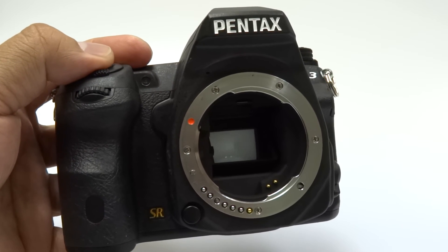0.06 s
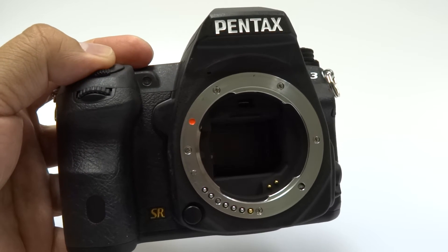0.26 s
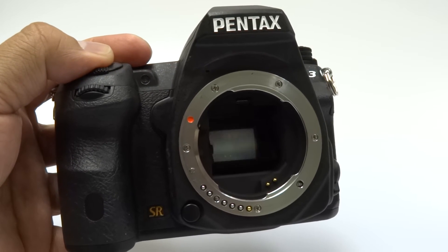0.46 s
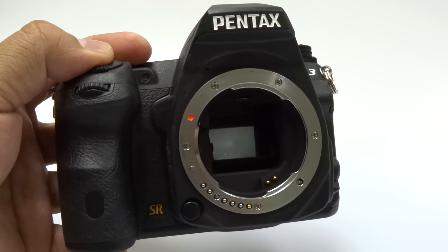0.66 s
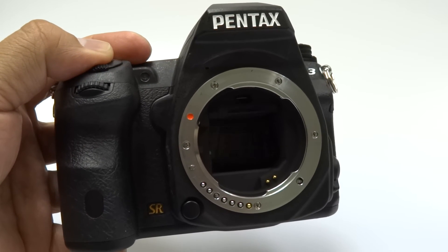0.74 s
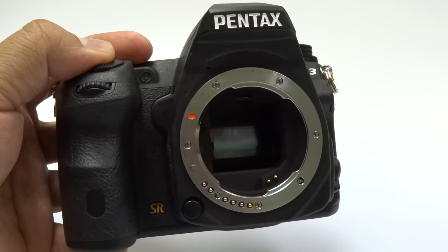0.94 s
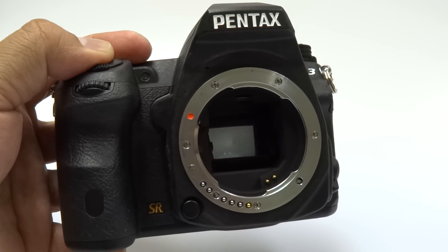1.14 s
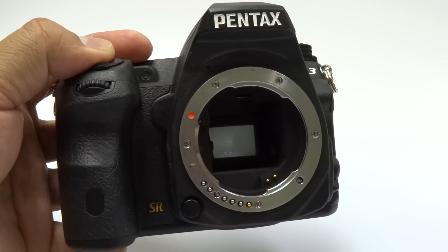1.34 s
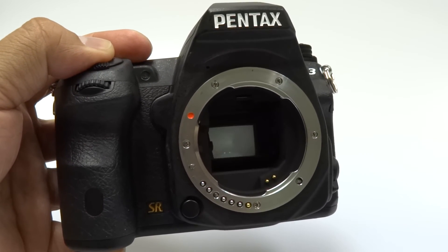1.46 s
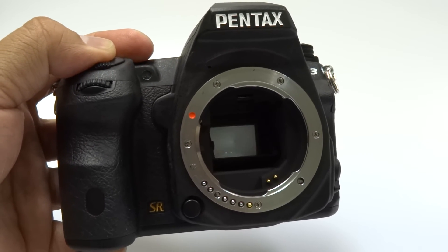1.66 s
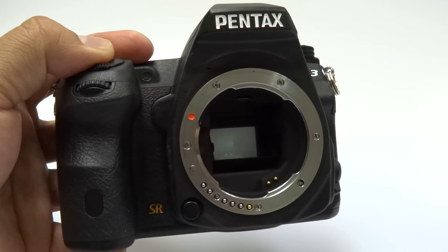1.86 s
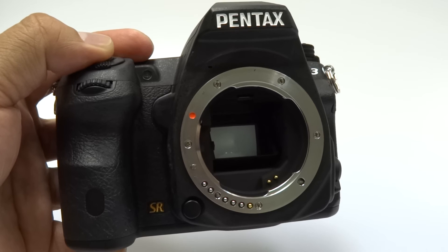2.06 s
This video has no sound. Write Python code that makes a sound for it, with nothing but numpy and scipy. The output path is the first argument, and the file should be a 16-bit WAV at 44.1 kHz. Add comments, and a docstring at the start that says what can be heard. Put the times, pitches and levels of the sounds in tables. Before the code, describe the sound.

Ten quick camera shutter and mirror clacks in an even run in a quiet room.

```python
"""A reflex camera fires ten shots, close by, in a quiet room with a faint hum.
The release button ticks. In each shot the release magnet whines and its armature scrapes,
the mirror flips up, two shutter curtains snap across, gears recock the mechanism, and the mirror
drops back with a spring sizzle and a hollow knock. The contacts ring the camera body and the room
reverberates. The first shot is slower; the rest follow about 0.16 s apart."""
import sys
import numpy as np
from scipy import signal
from scipy.fft import rfft, irfft
from scipy.io import wavfile
from scipy.ndimage import uniform_filter1d

SR = 44100
rng = np.random.default_rng(int(sys.argv[2]) if len(sys.argv) > 2 else 0)


def to_wav(sig):
    """Store sig (one row per channel, or 1-D mono) as 16-bit WAV at the path in sys.argv[1].

    Samples outside -1..1 are clipped; the rate is SR.
    """
    pcm = np.clip(np.atleast_2d(sig), -1, 1) * 32767
    pcm = np.round(pcm).astype(np.int16)
    wavfile.write(sys.argv[1], SR, pcm.T)  # frames by channels


N = 92610
SHORT = 4096  # samples per burst
TOP_HZ = 11020


# Shots: open t/s, close t/s, return t/s, level/dB, knock level/dB
SHOTS = [(0.2521, 0.31, .3499, -1.5, -3), (.4487, 0.47, .5106, -.5, -4.5), (0.608, 0.6306, .6710, 0.5, -3),
         (.7691, 0.7913, .8320, 0, -0.5), (0.9309, 0.9536, .9938, -1, -9), (1.0923, 1.1152, 1.1558, 0, -2),
         (1.2543, 1.2765, 1.3172, 0, -1), (1.4162, 1.439, 1.4782, 0.5, -0.5),
         (1.5766, 1.5994, 1.6400, -.5, -2), (1.738, 1.7614, 1.8018, -.5, -2.5)]
# Contacts in a shot: part, stage, delay from stage/s, level/dB, rise/s, decay/s
CONTACTS = [("lever", "open", -.0146, -19, 0.00067, .003), ("lever", "open", -.0131, -13, 0.00151, 0.0013),
            ("mirror", "open", -.009, -19.5, 0.00052, .0014),
            ("mirror", "open", -0.0059, -19.5, .0003, 0.0024),
            ("blade", "open", -0.0001, -10.5, .0001, 0.00063),
            ("blade", "open", 0.00054, -22, 0.00052, 0.0044), ("blade", "open", .0047, -17, 0.00048, .002),
            ("blade", "open", 0.0049, -19.5, 0.00013, 0.0034),
            ("curtain", "close", -.007, -22, 0.00051, 0.0023),
            ("blade", "close", -0.0047, -24, 0.00033, 0.00056),
            ("blade", "close", -.0006, -22, 0.00034, 0.0013),
            ("curtain", "close", .0001, -14.5, 0.00113, 0.0015),
            ("gear", "return", -0.017, -22, .0005, 0.0025),
            ("gear", "return", -.0114, -19.5, 0.0023, 0.0037),
            ("stop", "return", -.0014, -18, 0.0013, 0.0034), ("stop", "return", .0033, -21, 0.0014, 0.0048),
            ("lever", "return", .008, -22.5, 0.0011, 0.0038)]

def contact_forces(repeat_share=0.62, scatter_db=1.04, return_jitter_s=0.0005):
    """Force on each part: the same contacts strike in every shot, more loosely on the return."""
    forces = {part: np.zeros(N) for part in PART_COLOURS}
    for part, stage, delay_s, db, rise_s, decay_s in CONTACTS:
        shape = envelope(rise_s, decay_s)
        repeated = chatter(shape)
        loose = stage == "return"
        share = repeat_share / 2 if loose else repeat_share
        for open_s, close_s, return_s, shot_db, _ in SHOTS:
            strength, lateness = rng.standard_normal(2)
            stage_s = {"open": open_s, "close": close_s, "return": return_s}[stage]
            start_s = stage_s + delay_s + loose * lateness * return_jitter_s
            burst = np.sqrt(share) * repeated + np.sqrt(1 - share) * chatter(shape)
            add(forces[part], start_s, burst * undb(db + shot_db + scatter_db * strength))
    return forces


def gear_force(level_db=-22.5, lead_s=0.033, grain_db=2.5):
    """Gear teeth rattle up to speed before the mirror returns."""
    out = np.zeros(N)
    shape = envelope(rise_s=0.026, decay_s=0.011)
    for _, _, return_s, shot_db, _ in SHOTS:
        teeth = unit(rng.standard_normal(SHORT) * undb(grain_db * rng.exponential(size=SHORT)))
        add(out, return_s - lead_s, teeth * shape * undb(level_db + shot_db))
    return out


# Spectrum of each part: f/Hz, relative level/dB
PART_COLOURS = {"lever": [(100, -60), (250, -28), (650, -13.5), (1200, -18), (1800, -11), (2400, 5),
                (3000, -3), (3900, -12), (4900, -9), (7000, -19), (8700, -7), (10800, -9.5)],
                "mirror": [(100, -32), (250, -25), (680, 3), (1200, -9), (1800, 6.5), (2450, -14),
                (3800, -1), (4900, -4.5), (7200, -6), (8800, 0), (10800, -2.5)], "blade": [(40, -51),
                (100, -32), (250, -23.5), (650, -11), (1200, -19.5), (1800, -14), (2450, -1), (3000, 0.5),
                (3900, -13), (4900, -0.5), (7200, -4.5), (8800, -3), (10800, -5)], "curtain": [(100, -58),
                (250, -32), (650, -8.5), (1200, -15.5), (1800, -16.5), (2550, -8.5), (3900, -10.5),
                (4950, 2.5), (6000, -11.5), (7200, -14.5), (8800, -8), (10800, -6)], "gear": [(100, -57),
                (250, -21.5), (600, -5.5), (1200, -13), (1800, -3.5), (2800, -0.5), (3900, -7.5),
                (5000, 0.5), (6000, -2.5), (7200, -9.5), (8800, -6.5), (10800, -5)], "stop": [(100, -55),
                (250, -21), (650, -6), (1200, -17), (1800, -8.5), (2450, 6.5), (3000, 3.5), (3900, -1),
                (4900, -6), (7200, -2.5), (8900, 3.5), (10800, -10)]}

def clacks():
    """Each force sounds through its own part and through the body."""
    forces = contact_forces()
    forces["gear"] += gear_force()
    parts = sum(ring(forces[part], response(colour)) for part, colour in PART_COLOURS.items())
    return parts + body(sum(forces.values()))


# Body modes: f/Hz, level/dB, t60/s
BODY_MODES = [(1754, -24.5, 0.07), (2340, -29.5, 0.2), (2435, -31.5, .1), (2744, -25.5, 0.046),
              (2980, -21.5, 0.068), (3580, -27.5, 0.15), (4550, -36.5, 0.13), (4710, -32, 0.098),
              (4970, -22.5, 0.023), (5370, -39.5, .06), (9840, -24, 0.17)]

def body(force):
    """All contacts ring the same damped modes of the camera body."""
    t = np.arange(SR // 2) / SR
    modes = sum(undb(db) * unit(np.cos(2 * np.pi * hz * t) * undb(-60 * t / t60_s))
                for hz, db, t60_s in BODY_MODES)
    return ring(force, modes / np.sqrt(len(t)))


def mirror_swing(recoil_db=-66.5, spring_db=-28.5, knock_db=-27.5, knock_delay_s=0.00976):
    """The rising mirror jolts the body; on its return a spring sizzles and the mirror box knocks."""
    out = np.zeros(N)
    centre_s = SHORT / 2 / SR
    for open_s, _, return_s, shot_db, shot_knock_db in SHOTS:
        knock = tone_pulse(hz=536 * (1 + 0.0066 * rng.standard_normal()), sigma_s=0.0049)
        spring = noise_band(hz=10260, width_hz=1300) * envelope(rise_s=0.0016, decay_s=0.012)
        recoil = tone_pulse(hz=54.6, sigma_s=0.0036)
        add(out, open_s - centre_s, undb(recoil_db) * recoil)
        add(out, return_s, undb(spring_db + shot_db) * spring)
        add(out, return_s + knock_delay_s - centre_s, undb(knock_db + shot_knock_db) * knock)
    return out


MAGNET_LEAD_S = 0.0287

def magnet(hz=9980, level_db=-28.5, rise_s=0.00077, on_s=0.0094, decay_s=0.0022):
    """The pulsed release magnet whines just before the mirror moves."""
    out = np.zeros(N)
    t = np.arange(SHORT) / SR
    shape = (1 - np.exp(-t / rise_s)) * np.exp(-np.maximum(t - on_s, 0) / decay_s)
    for open_s, *_ in SHOTS:
        whine = sine(hz, t) + 0.2 * noise_band(hz, width_hz=720)
        add(out, open_s - MAGNET_LEAD_S, undb(level_db) * shape * whine)
    return out


def armature(level_db=-43):
    """The magnet's armature scrapes faintly as it pulls in."""
    force = np.zeros(N)
    for open_s, *_ in SHOTS:
        scrape = chatter(envelope(rise_s=0.0005, decay_s=0.012))
        add(force, open_s - MAGNET_LEAD_S, undb(level_db) * scrape)
    return ring(force, response(PART_COLOURS["mirror"]))


def button(start_s=0.2135, level_db=-40, band_hz=(1400, 4000)):
    """The release button ticks softly before the first shot."""
    force = np.zeros(N)
    add(force, start_s, undb(level_db) * chatter(envelope(rise_s=0.00067, decay_s=0.0028)))
    return signal.sosfilt(signal.butter(2, band_hz, "band", fs=SR, output="sos"), force)


# Reverb decay: f/Hz, t60/s
ROOM_T60 = [(150, 0.7), (400, 0.72), (1000, 0.55), (2800, 0.5243), (7300, 0.37), (11000, 0.26)]
# Reverb spectrum: f/Hz, relative level/dB
ROOM_COLOUR = [(60, -26.5), (200, 3.5), (550, -2.5), (1100, 9), (2600, -1), (4800, -1), (8000, -1.5),
               (11000, 3)]

def room(x, level_db=-7.5, gap_s=0.0052, build_s=0.0065):
    """Diffuse reflections of a small room; the treble dies first."""
    t = np.arange(SR) / SR
    f, _, cells = signal.stft(rng.standard_normal(SR), SR)
    age_s = np.linspace(0, 1, cells.shape[1])
    cells *= undb(along(ROOM_COLOUR, f))[:, None]
    cells *= undb(-60 * age_s / along(ROOM_T60, f)[:, None])
    tail = signal.istft(cells, SR)[1][:SR] * np.clip((t - gap_s) / build_s, 0, 1)
    return ring(x, tail / np.linalg.norm(tail)) * undb(level_db)


# Air noise spectrum: f/Hz, relative level/dB
AIR_COLOUR = [(15, -64), (25, -50), (112, -20.5), (192, -8.5), (235, -14.5), (260, -11.5), (344, -8.5),
              (433, -10.5), (703, -13), (4180, -36.5), (11000, -38), (14300, -87), (22000, -120)]

def room_tone(air_db=-54, hum_db=-65.5):
    """Soft low air noise with a wavering hum."""
    air = unit(equalise(rng.standard_normal(N), AIR_COLOUR))
    hum = noise_band(hz=187, width_hz=21, size=N)
    return undb(air_db) * air + undb(hum_db) * hum


def chatter(shape):
    """A burst of tiny contacts under an envelope, with an even spectrum."""
    x = rng.standard_normal(SHORT) * shape
    for _ in range(2):
        spectrum = rfft(x)
        white = irfft(spectrum / (abs(spectrum) + 1e-12))
        local_power = abs(uniform_filter1d(white ** 2, size=24))
        x = white * shape / np.sqrt(local_power + 1e-12)
    return x


def response(colour):
    """Minimum-phase impulse response of a colour, with unit energy below TOP_HZ."""
    f = np.fft.rfftfreq(SHORT, 1 / SR)
    cepstrum = irfft(np.log(undb(along(colour, f))))
    cepstrum[1:SHORT // 2] *= 2
    cepstrum[SHORT // 2 + 1:] = 0
    impulse = irfft(np.exp(rfft(cepstrum)))
    return impulse / np.sqrt(np.mean(abs(rfft(impulse)) ** 2 * (f < TOP_HZ)))


def noise_band(hz, width_hz, size=SHORT):
    """Unit-rms noise in one resonance."""
    f = np.fft.rfftfreq(size, 1 / SR)
    resonance = 1 / (1 + (2 * (f - hz) / width_hz) ** 2)
    return unit(irfft(rfft(rng.standard_normal(size)) * resonance, size))


def sine(hz, t):
    """Unit-rms sine, random phase."""
    return unit(np.sin(2 * np.pi * (hz * t + rng.random())))


def tone_pulse(hz, sigma_s):
    """Sine under a Gaussian, centred in SHORT samples."""
    t = (np.arange(SHORT) - SHORT // 2) / SR
    return sine(hz, t) * np.exp(-(t / sigma_s) ** 2 / 2)


def envelope(rise_s, decay_s):
    """Linear rise, exponential fall."""
    t = np.arange(SHORT) / SR
    return np.minimum(t / rise_s, 1) * np.exp(-np.maximum(t - rise_s, 0) / decay_s)


def equalise(x, colour):
    """Zero-phase filter."""
    return irfft(rfft(x) * undb(along(colour, np.fft.rfftfreq(N, 1 / SR))), N)


def ring(x, impulse):
    """Convolve, cut to N samples."""
    return signal.fftconvolve(x, impulse)[:N]


def along(table, hz):
    """Interpolate on a log-frequency axis."""
    f, values = np.array(table, float).T
    return np.interp(np.log(hz + 1), np.log(f), values)


def add(out, start_s, x):
    """Mix x into out."""
    i = max(round(start_s * SR), 0)
    out[i:i + len(x)] += x[:N - i]


def undb(db):
    """Decibels to gain."""
    return 10 ** (np.asarray(db) / 20)


def unit(x):
    """Scale to rms 1."""
    return x / np.sqrt(np.mean(x ** 2))


# Stereo width: f/Hz, side level/dB
SIDE_COLOUR = [(100, -4.5), (500, 0), (2000, -1), (5000, 3.5), (10000, 3.5)]

def scene(balance_db=-0.77):
    """Camera almost central; independent clacks, reverb and room tone in the side signal add width."""
    camera = button() + magnet() + armature() + clacks() + mirror_swing()
    mid = camera + room(camera) + room_tone()
    side = equalise(0.14 * clacks() + 0.23 * room(camera) + 0.19 * room_tone(), SIDE_COLOUR)
    return np.array([(mid + side) * undb(balance_db / 2), (mid - side) * undb(-balance_db / 2)])


def record(dry):
    """Steep low-pass at TOP_HZ."""
    return signal.sosfilt(signal.ellip(10, 0.2, 75, TOP_HZ, fs=SR, output="sos"), dry)


dry = scene()
out = record(dry)
to_wav(out)
```